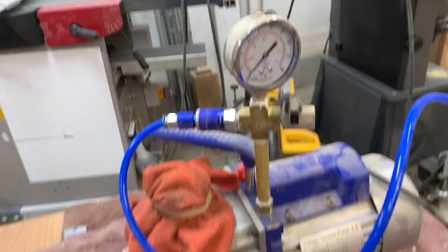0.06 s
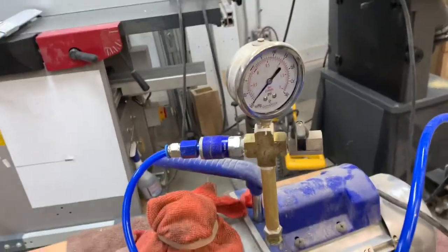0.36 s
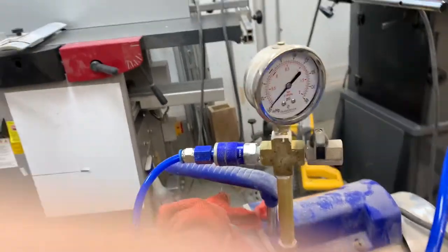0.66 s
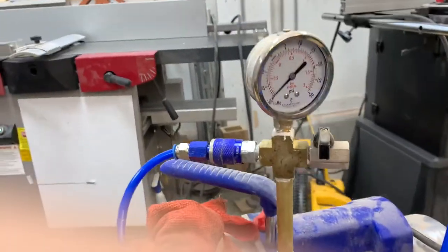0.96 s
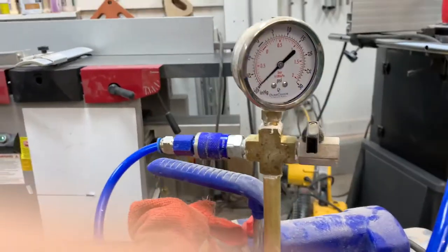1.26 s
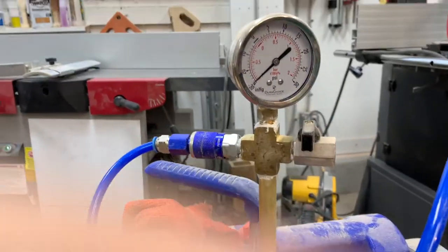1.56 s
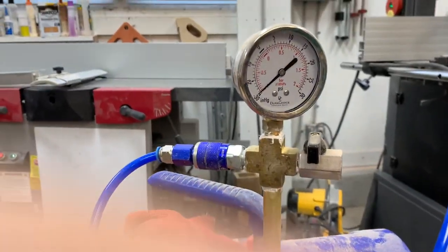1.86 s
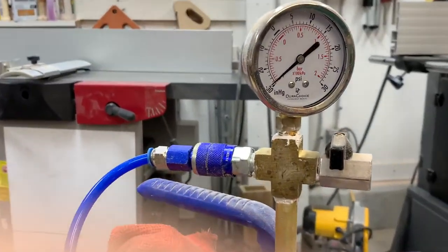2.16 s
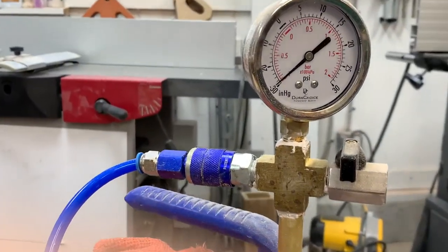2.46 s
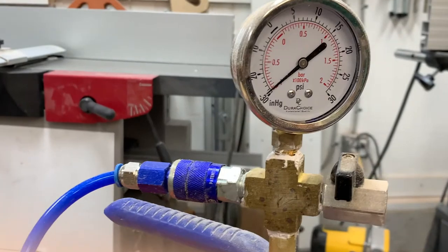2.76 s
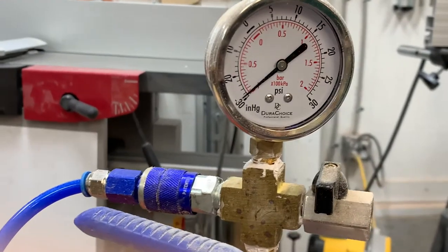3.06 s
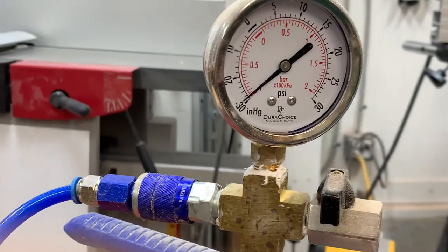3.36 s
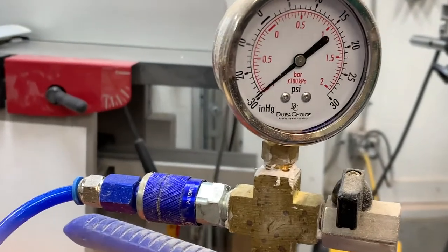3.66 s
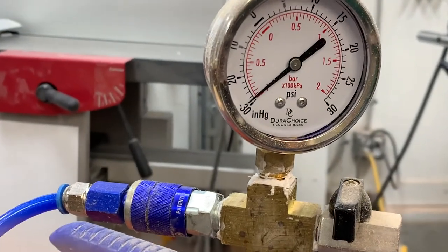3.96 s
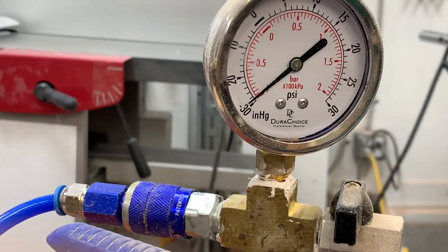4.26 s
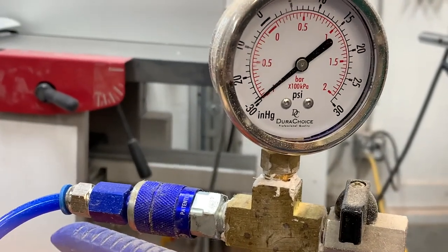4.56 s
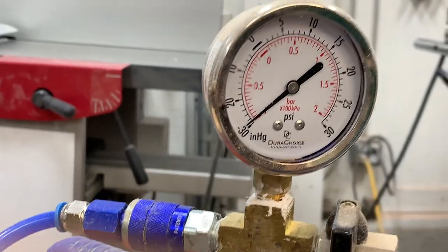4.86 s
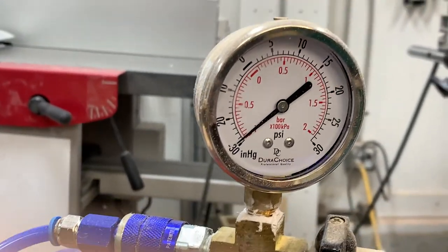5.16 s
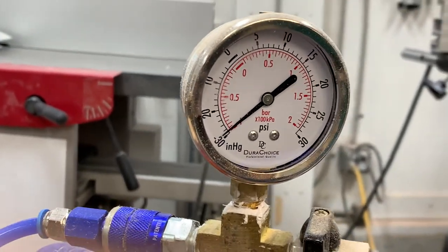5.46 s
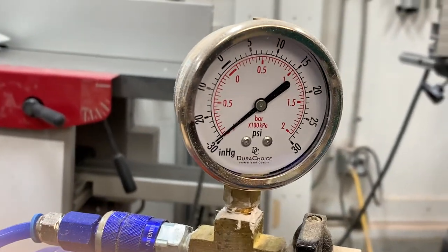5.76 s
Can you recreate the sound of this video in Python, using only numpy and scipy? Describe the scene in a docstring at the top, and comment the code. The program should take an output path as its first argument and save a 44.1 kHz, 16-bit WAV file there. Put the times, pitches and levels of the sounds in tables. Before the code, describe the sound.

A vacuum pump runs without pause in a workshop, heard from close by. Its deep motor hum throbs slowly under a buzzing drone, while oil churns in the casing with a few faint, brief rings. Very fast ticking, fan hiss and a thin, warbling high whine lie on top. Early on, the microphone moves from beside the pump to above it, and the churning grows slightly fuller.

```python
"""A deep, slowly beating hum: a rotary-vane vacuum pump in a workshop, heard from beside it, then above.
Twice its shaft rate lies just below the magnetic hum of the motor, so the two tones beat. Oil churns and
rings the casing, vanes and valve tick on every turn, and the turbulence of fan and exhaust hisses.
A thin, warbling whine, likely a motor drive, lies on top."""
import sys
import numpy as np
from scipy import signal
from scipy.fft import rfft, irfft, next_fast_len
from scipy.io import wavfile

SR = 44100
rng = np.random.default_rng(int(sys.argv[2]) if len(sys.argv) > 2 else 0)


def store_wav(level_fs):
    """Save 16-bit WAV to argv[1]."""
    pcm = np.round(np.clip(np.atleast_2d(level_fs), -1, 1) * 32767)
    wavfile.write(sys.argv[1], SR, pcm.T.astype(np.int16))


N = 255780
TIME = np.arange(N) / SR
FREQS = np.maximum(np.arange(N // 2 + 1) * SR / N, 1)
EAR_SPLIT = np.array([[.5], [-.5]])   # shares a difference between left and right

SHAFT_HZ, HUM_HZ = 59.1666, 119.861
IN_PHASE_S = .475   # a moment when pumping stroke and magnetic hum push together


def drone(turns):
    """Beating: the motor slips behind the mains, so two strokes a turn drift against the magnetic hum."""
    # magnetic hum along the listener's path: (time [s], level [dB])
    hum_levels = [(.15, -26.2), (.8, -27), (1.5, -28.5), (2.1, -28.5), (4, -27), (5.8, -28)]
    shaft = turns - SHAFT_HZ * IN_PHASE_S
    mains = HUM_HZ * (TIME - IN_PHASE_S) + .076 * EAR_SPLIT   # reaches the left ear first
    throb = tone(shaft + .5, level_db=-38.5)
    stroke = tone(2 * shaft, level_db=-31) * pan(lean_db=2.8)
    hum = tone(mains, np.interp(TIME, *np.transpose(hum_levels))) * pan(lean_db=2)
    return throb + stroke + hum


def hum_octave(turns, beat_lead_s=.06):
    """Combination tone: the sum frequency of hum and stroke beats against the octave of the hum."""
    mains = HUM_HZ * (TIME - IN_PHASE_S + beat_lead_s)
    stroke = 2 * (turns - SHAFT_HZ * (IN_PHASE_S - beat_lead_s))
    return tone(2 * mains, level_db=-50) + tone(mains + stroke, level_db=-56.5)


def overtones(turns):
    """Periodic forcing: harmonics of the shaft sound with the tones of the motor, all wavering."""
    # shaft harmonics: (multiple of the shaft rate [1], relative level [dB])
    harmonics = [(3, -68), (4, -63.5), (6, -48), (9, -53), (10, -52.5), (11, -51), (12, -47.5), (17, -53.5),
                 (18, -50.5), (20, -48.5), (22, -50), (23, -57), (24, -48.5), (25, -56), (27, -68),
                 (28, -54), (35, -68), (36, -61), (39, -52.5), (40, -54.5), (47, -56.5), (48, -64),
                 (51, -65), (54, -69.5), (67, -63), (68, -60), (76, -72), (86, -61)]
    # tones of motor iron and mountings: (frequency [Hz], relative level [dB])
    motor_tones = [(76, -62), (179.8, -56), (359.6, -54), (479.4, -46.5), (537.9, -51.5), (539.4, -53),
                   (544, -49.5), (599.3, -55), (1545, -51)]
    # harmonics that throb with the beat of stroke and hum: multiple [1] -> (depth [dB], lag [s])
    throbs = {9: (9.7, 0.13), 20: (3.2, 0.13), 39: (2.2, 0.41), 40: (5.5, 0.011), 47: (2.4, 0.33)}
    partials = [(order * turns, order * SHAFT_HZ, db) for order, db in harmonics]
    partials += [(hz * TIME + .054 * drift(.61), hz, db) for hz, db in motor_tones]
    out, beat_hz = 0, HUM_HZ - 2 * SHAFT_HZ
    for cycles, hz, level_db in partials:
        sway = np.sin(2 * np.pi * (rng.random() + TIME / 10))
        ear_phase = min(hz / 18000, .5) * sway * EAR_SPLIT   # shorter waves differ more between ears
        phase = cycles + rng.random() + ear_phase
        flutter = .063 * min(hz / 2400, 1) * drift(6.7)
        depth_db, lag_s = throbs.get(round(hz / SHAFT_HZ, 1), (0, 0))
        throb_db = depth_db * np.cos(2 * np.pi * beat_hz * (TIME - IN_PHASE_S - lag_s))
        tilt_db = .5 * np.log2(hz / 1000)
        out += tone(phase + flutter, level_db + throb_db + tilt_db + 3 * drift(9.3))
    return out * from_db(listener_db(beside=-2, above=.5))


def oil(turns):
    """Forced resonance: oil churns in time with the vanes and excites the modes of the casing."""
    # churning oil: (frequency [Hz], relative spectral level [dB])
    spectrum = [(20, -27), (45, -7), (90, -9), (160, -6), (260, -1.5), (400, 0.5), (480, -1.5), (700, 0.5),
                (850, -0.5), (1000, 2.5), (1330, 1), (1480, -2.5), (1720, -1), (2000, -8.5), (4000, -28.5)]
    # casing modes: (frequency [Hz], width [Hz], relative level [dB])
    casing = [(410, 73, -3.5), (775, 49, 0), (1008, 83, -11), (1708, 79, -2), (2460, 104, -4.5),
              (3192, 47, -4), (3930, 63, -5.5)]
    flare_db = -2.5 * drift(5.1)   # the main mode flares at random
    main_mode = from_db(-12.5 + flare_db) * turbulence(resonance(hz=1210, width_hz=63) ** 2)
    response = sum(from_db(db) * resonance(hz, width_hz) ** 2 for hz, width_hz, db in casing)
    other_modes = from_db(-12) * turbulence(response)
    churn = turbulence(from_db(at_hz(spectrum)))
    pulsing = 1 + .1 * np.cos(2 * np.pi * 4 * turns)
    return pulsing * from_db(listener_db(beside=-35, above=-33)) * (churn + main_mode + other_modes)


def splashes(ring_hz=1193, wander_hz=18.9, half_length_s=.044):
    """Transient excitation: each strong splash of oil draws an unsteady note from the casing."""
    # strongest splashes: (time [s], level [dB])
    events = [(1.332, -37), (2.075, -36.5), (3.11, -37), (3.408, -38), (3.84, -35), (5.275, -34.5),
              (5.53, -37.5), (5.78, -40)]
    note = tone(np.cumsum(ring_hz + wander_hz * drift(24.8)) / SR, level_db=0)
    return note * sum(from_db(db) * bell_curve(at_s, half_length_s) for at_s, db in events)


def vanes(turns):
    """Impact and friction: the vanes tick on every turn and slide along the bore in between."""
    # vane impacts: (position [turns], frequency [Hz], width [Hz], relative level [dB], T60 [s])
    contacts = [(.3, 6600, 870, -51, 0.011), (0.56, 6880, 460, -53, 0.025), (0.65, 5870, 660, -49, .022),
                (.3, 5830, 860, -49.5, .04), (.3, 2685, 700, -49.5, .021), (.46, 2570, 790, -52, .021),
                (.63, 4900, 1400, -52.5, .04), (.3, 3830, 1300, -57, .06)]
    # fading as the listener sets off, swelling on arrival: (time [s], half length [s], change [dB])
    swings = [(0.343, 0.25, -6), (1.6, 0.37, 1)]
    rubbing = from_db(-47) * turbulence(resonance(hz=5940, width_hz=3700) ** 4)
    ticking = impacts(turns, contacts, uneven_db=2.5, common_weight=.71) * pan(lean_db=-2.5)
    swing_db = sum(db * bell_curve(at_s, half_s) for at_s, half_s, db in swings)
    return (ticking + rubbing) * from_db(listener_db(beside=-3, above=-.4) + swing_db)


def valve(turns):
    """Impact and rebound: the valve strikes and bounces on every turn, ringing in the high treble."""
    # strikes and bounce: (position [turns], frequency [Hz], width [Hz], relative level [dB], T60 [s])
    strikes = [(.64, 11000, 900, -55.5, 0.022), (.7, 9500, 1100, -49.5, 0.13)]
    bounce = [(.79, 11360, 600, 0, 0.032)]
    striking = impacts(turns, strikes, uneven_db=2, common_weight=7.2)
    bouncing = impacts(turns, bounce, uneven_db=1, common_weight=3.4)
    return (striking * from_db(listener_db(beside=2.5, above=-.5))
            + bouncing * from_db(listener_db(beside=-51, above=-77)))


def fan():
    """Aerodynamic noise: the turbulent air of the fan gives a broadband hiss."""
    # fan air: (frequency [Hz], relative spectral level [dB])
    spectrum = [(300, -7.5), (1500, -2), (1880, 1.5), (2200, 1), (2450, 6), (2750, -0.5), (3200, 0),
                (3550, -1.5), (3950, -0.5), (4600, 1), (5600, -10), (7100, -3), (8500, -9.5), (9800, -7),
                (10500, -8), (11200, -8), (12200, -14.5), (15500, -17)]
    return from_db(listener_db(beside=-39, above=-38.5)) * turbulence(from_db(at_hz(spectrum)))


def whine(hz=10003, sweep_hz=66, sweeps_per_s=10.85, width_hz=100, echo=.33):
    """Slope detection: a switching tone swept to and fro through a resonance pulses twice a sweep."""
    out = np.zeros((2, N))
    for path, delay_s in enumerate(rng.uniform(0, .0363, 4)):
        reflected = path > 0   # the direct sound, then three wall echoes that make it fade unevenly
        sweep = 2 * np.pi * sweeps_per_s * (TIME - .012 - delay_s * reflected)
        offset_hz = sweep_hz * signal.sawtooth(sweep, .5)
        lopsided = 1 - .2 * np.sin(sweep)   # louder on the way down
        pulses = lopsided / (1 + (2 * offset_hz / width_hz) ** 2) ** 2
        path_phase = np.array([drift(1.3), drift(2.2)]) / 2 if reflected else 0
        carrier = tone(np.cumsum(hz + offset_hz) / SR + path_phase, 1.7 * drift(15))
        out += pulses * carrier * (echo if reflected else 1)
    return from_db(listener_db(beside=-45, above=-49.5)) * unit_rms(out)


def exhaust():
    """Flow noise: air leaving the pump adds a faint, high hiss."""
    return from_db(-57) * turbulence(resonance(hz=12500, width_hz=9000) ** 2)


def impacts(turns, contacts, uneven_db, common_weight, size=4096):
    """Free decay: each contact strikes once a turn and leaves a dense cluster of modes ringing."""
    out, count = 0, np.arange(int(turns[-1]))
    freqs = np.maximum(np.fft.rfftfreq(size, 1 / SR), 1)
    for position, hz, width_hz, level_db, t60_s in contacts:
        strike_s = np.interp(count + position, turns, TIME) + 6e-6 * rng.standard_normal(len(count))
        starts = np.clip(np.round(strike_s * SR).astype(int), 0, N - 1)
        strengths = from_db(uneven_db * rng.standard_normal(len(count)))
        per_ear, common = rng.standard_normal((2, 2, size)), rng.standard_normal((2, 1, size))
        bursts = (per_ear + common_weight * common) * from_db(-60 * TIME[:size] / t60_s)
        ring_a, ring_b = irfft(rfft(bursts) * resonance(hz, width_hz, freqs) ** 2, size)
        blend = TIME + .4 * drift(2)   # the mix of modes keeps shifting
        ringing = np.zeros((2, N + size))
        for i, strength in zip(starts, strengths):
            ringing[:, i:i + size] += strength * (np.cos(blend[i]) * ring_a + np.sin(blend[i]) * ring_b)
        out += from_db(level_db) * np.array([unit_rms(ear) for ear in ringing[:, :N]])
    return out


def turbulence(response):
    """Partial coherence: filtered noise of unit power, alike at both ears in some bands, else diffuse."""
    # likeness of the ears: (frequency [Hz], correlation [1])
    coherence = [(60, 0.73), (250, 0.99), (700, 0.87), (1200, 0.91), (1700, 0.79), (2050, 0.57),
                 (2400, 0.51), (3000, 0.16), (3500, .15), (3900, 0.75), (4400, .7), (5000, 0.073),
                 (7200, 0.3), (8000, 1), (9600, 1), (11000, .95), (12300, 1), (13500, 0.93)]
    # rightward lean of the treble: (frequency [Hz], left minus right [dB])
    lean = [(1200, -0.7), (1800, 1), (2400, 0), (2800, 1.5), (3800, -2.5), (5800, -4.5), (7500, -1.5),
            (9000, 0)]
    mid, side = rfft(rng.standard_normal((2, N)))
    alike = np.clip(at_hz(coherence), -.99, .99)
    ears = np.sqrt(1 + alike) * mid + np.sqrt(1 - alike) * side * [[1], [-1]]
    return unit_rms(irfft(ears * response * pan(at_hz(lean)), N))


def reflection(x, delay_s, sway_s, echo):
    """Comb filtering: sound meets its echo off a nearby surface, whose delay sways with the listener."""
    delayed = TIME - delay_s - sway_s * drift(.34)
    return x + echo * np.array([np.interp(delayed, TIME, ear) for ear in x])


def shifting_colour(x):
    """Time-varying filtering: single bands swell or thin for a moment."""
    # band swells: (time [s], half length [s], frequency [Hz], half width [Hz], change [dB])
    swells = [(.05, 0.24, 537, 50, 3), (.1, 0.35, 1800, 350, -1), (.1, .25, 2660, 200, -4.5),
              (.25, .25, 4970, 600, -2), (.3, 0.058, 3190, 70, 8), (.3, 0.61, 348, 50, -3.5),
              (.8, 0.1, 5100, 550, 0), (0.977, 0.091, 1770, 57.7, 9), (.6, .2, 2340, 70, 2.5),
              (1, .15, 2300, 61, 3.2), (1.167, 0.066, 530, 35, 4), (1.27, 0.089, 1730, 60, 4),
              (1.29, 0.078, 5670, 320, 7), (1.547, .17, 2780, 50.3, 3.5), (1.7, .7, 4300, 810, -1.5),
              (1.752, 0.9, 6930, 250, 3.5), (1.75, 0.2, 5800, 250, 3), (1.8, 0.25, 2050, 200, 2),
              (2.046, .28, 2770, 90, 1.5), (2.6, .3, 5740, 248, 3), (2.7, .25, 2310, 50, 1.5),
              (2.8, .15, 2780, 50, -1), (3.3, 0.87, 368, 70, 2), (3.35, .2, 1680, 60, 4.5),
              (3.48, 0.15, 2780, 50, 3), (3.75, .1, 2400, 130, 0.5), (4, .9, 4860, 450, 2.5),
              (4.4, .3, 1210, 50, 0.5), (4.55, 0.16, 5800, 247, 3), (5.22, 0.048, 534, 35, 5),
              (5.5, .3, 4700, 410, -2), (5.52, 0.26, 3170, 110, 7.5), (5.552, 0.2, 6600, 300, 6),
              (5.55, .35, 2370, 200, -1), (5.7, .45, 238, 50, -2)]
    out = x.copy()
    for at_s, half_s, hz, half_width_hz, change_db in swells:
        near = np.abs(TIME - at_s) < 3 * half_s
        size = next_fast_len(int(near.sum()))
        passband = bell_curve(hz, half_width_hz, np.fft.rfftfreq(size, 1 / SR))
        band = irfft(rfft(x[:, near], size) * passband, size)[:, :near.sum()]
        out[:, near] += band * (from_db(change_db * bell_curve(at_s, half_s, TIME[near])) - 1)
    return out


def at_ears(x):
    """Interaural delay: the treble reaches the left ear a little late."""
    # phase between the ears: (frequency [Hz], lead of the left [rad])
    phase = [(1300, 0), (2000, -1.5), (2700, 0), (3300, 0.3), (3900, -1.83), (4300, -0.9), (4700, -3.1),
             (5200, 0.5), (6900, 0.5), (7800, -3), (8900, -3), (10400, -5.5), (11800, -5.5), (12900, -10.5)]
    return irfft(rfft(x) * np.exp(1j * at_hz(phase) * EAR_SPLIT), N)


def listener_db(beside, above, midway_s=.88, move_s=1):
    """Level depends on position: it glides as the listener moves once, from beside to above the pump."""
    way = np.clip((TIME - midway_s) / move_s, -.5, .5)
    return beside + (above - beside) * (1 + np.sin(np.pi * way)) / 2


def resonance(hz, width_hz, freqs=FREQS):
    """Response of a damped oscillator, 1 at its peak."""
    return 1 / (1 + 1j * (freqs ** 2 - hz ** 2) / (freqs * width_hz))


def tone(cycles, level_db):
    """Simple harmonic motion at a given rms level."""
    return np.sqrt(2) * from_db(level_db) * np.cos(2 * np.pi * cycles)


def drift(rate_hz):
    """Slow random fluctuation: low-passed noise of unit rms."""
    hz = FREQS[FREQS < 100]
    noise = rng.standard_normal(2 * len(hz) - 2)
    slow = irfft(rfft(noise) / (1 + (hz / rate_hz) ** 2))
    return np.interp(TIME, np.linspace(0, TIME[-1], len(slow)), unit_rms(slow))


def bell_curve(centre, half_width, axis=TIME):
    """Gaussian window, 1/e at a half width from its centre."""
    return np.exp(-((axis - centre) / half_width) ** 2)


def at_hz(points):
    """Interpolation of a table over log frequency."""
    hz, value = np.transpose(points)
    return np.interp(np.log(FREQS), np.log(hz), value)


def pan(lean_db):
    """Interaural level difference as left and right gains."""
    return from_db(EAR_SPLIT * lean_db)


def from_db(db):
    """Decibels to amplitude ratio."""
    return np.exp(np.asarray(db) * (np.log(10) / 20))


def unit_rms(x):
    """Normalisation to unit power."""
    return x / np.sqrt(np.mean(x ** 2) + 1e-20)


def scene():
    """Superposition: the sounds of the pump add up while its shaft turns almost evenly."""
    turns = SHAFT_HZ * TIME + .0015 * drift(.8)
    hum = drone(turns) + hum_octave(turns)
    tones = overtones(turns)
    churn = oil(turns) + splashes()
    treble = fan() + vanes(turns) + valve(turns) + exhaust()
    drive = whine()
    treble = reflection(treble, delay_s=.003, sway_s=.00006, echo=.22)
    churn = reflection(churn, delay_s=.009, sway_s=.00033, echo=.14)
    return hum + at_ears(shifting_colour(tones + churn + treble) + drive)


def record(dry, cutoff_hz=15900):
    """Band limiting: a steep low-pass filter removes the highest treble."""
    return signal.sosfilt(signal.ellip(10, .1, 90, cutoff_hz, fs=SR, output="sos"), dry)


dry = scene()
out = record(dry)
store_wav(out)
```